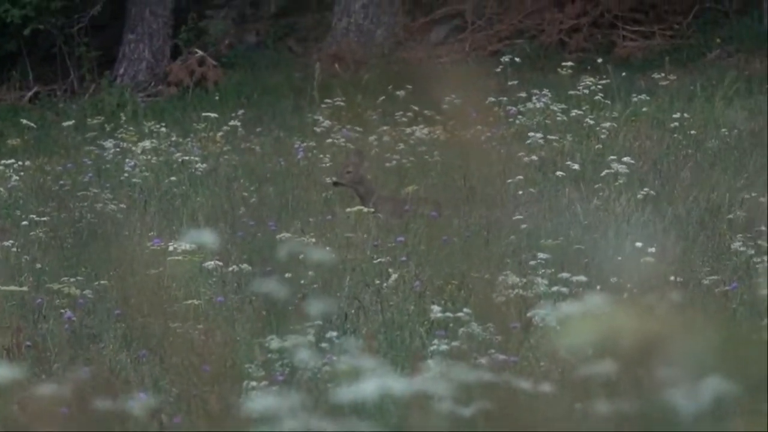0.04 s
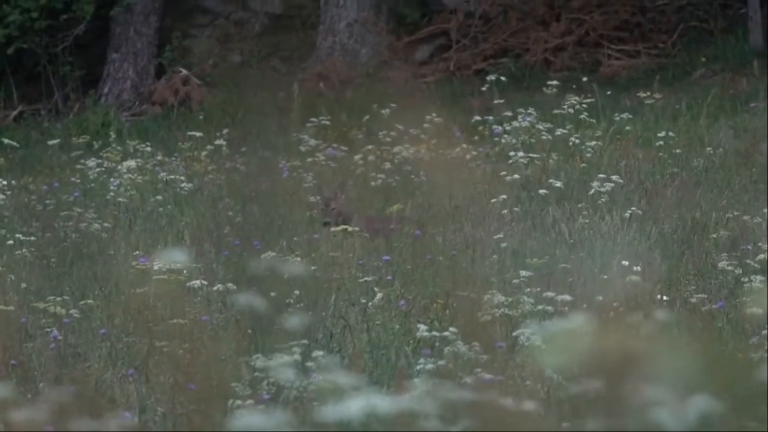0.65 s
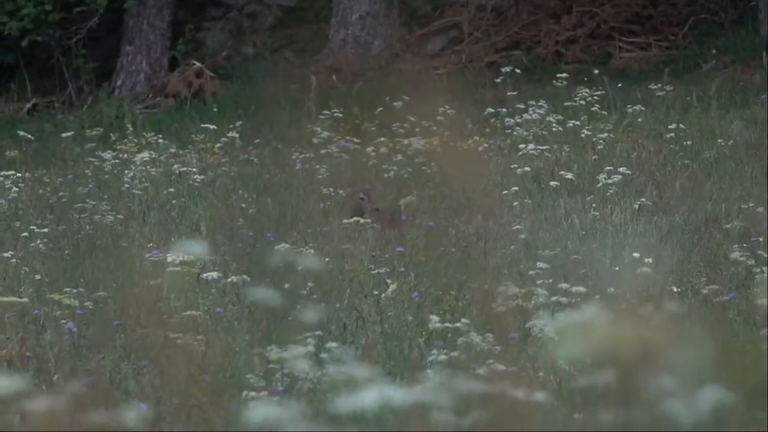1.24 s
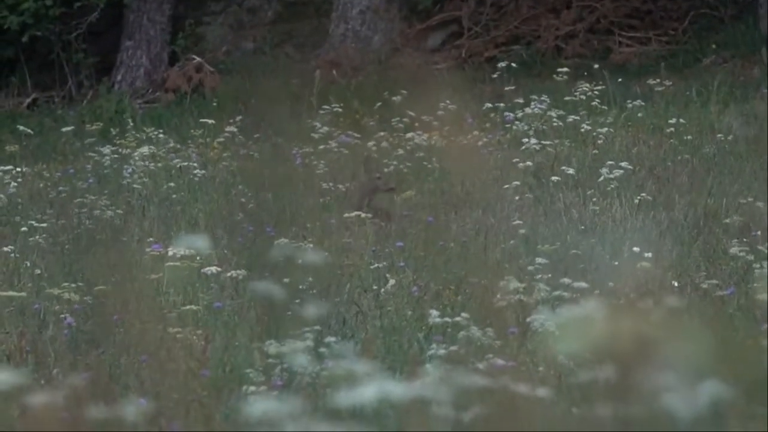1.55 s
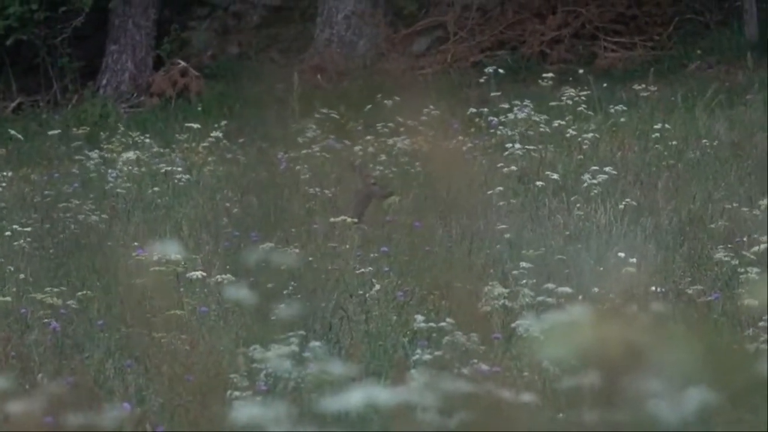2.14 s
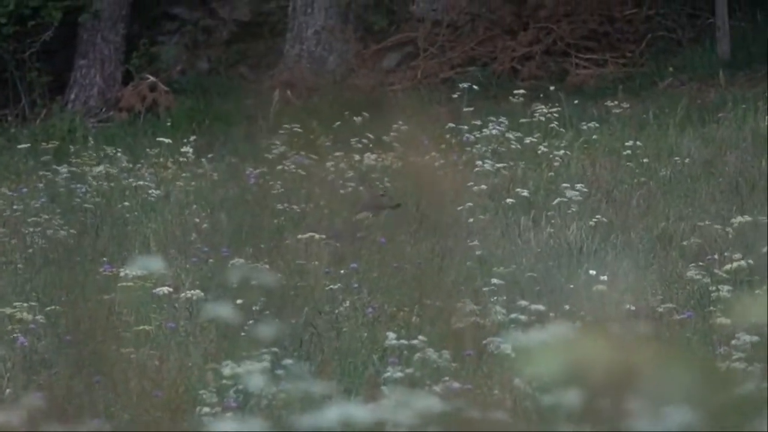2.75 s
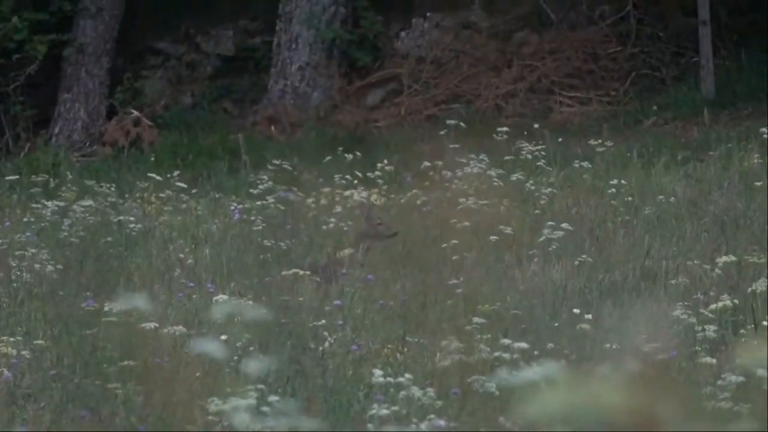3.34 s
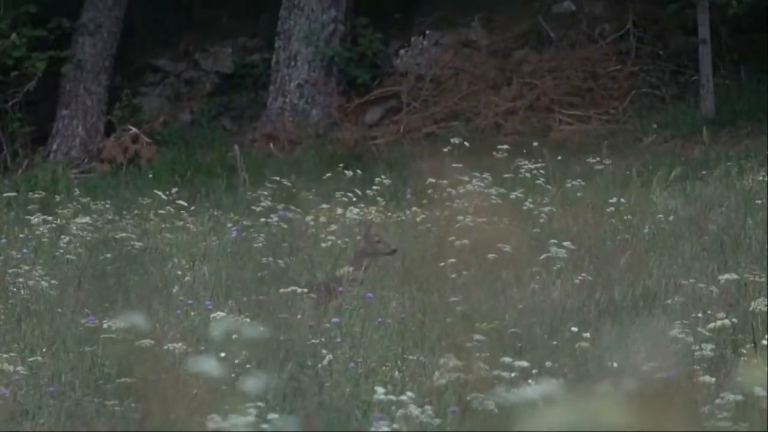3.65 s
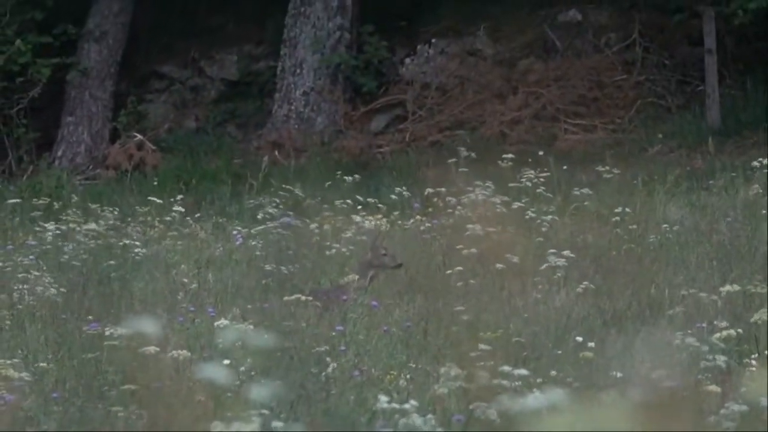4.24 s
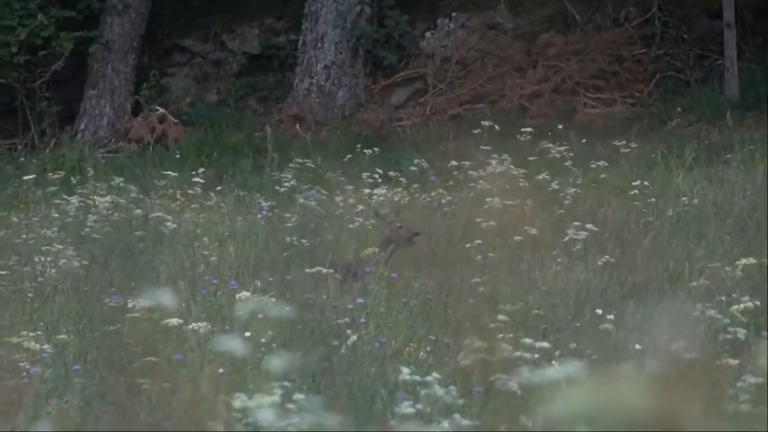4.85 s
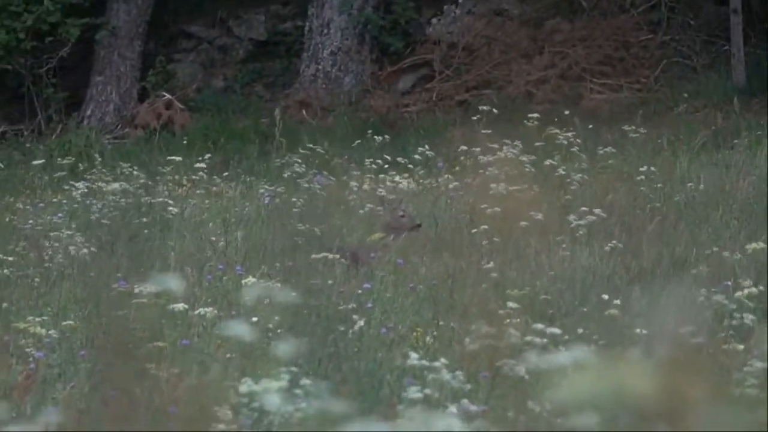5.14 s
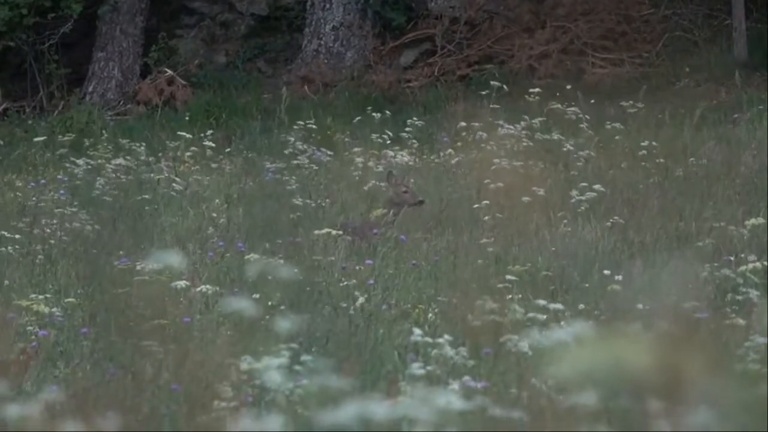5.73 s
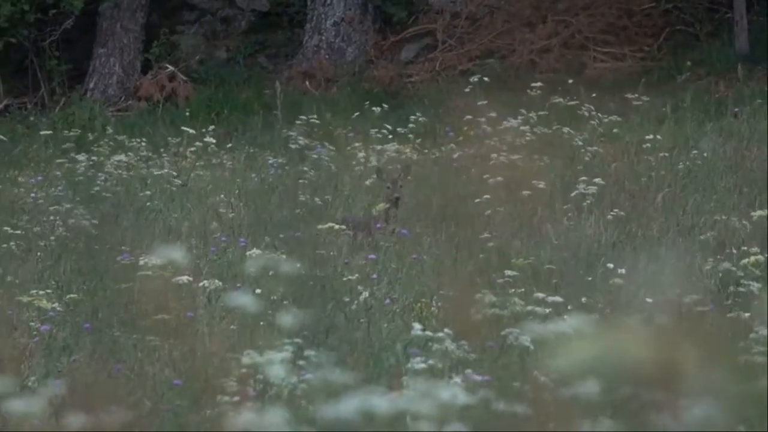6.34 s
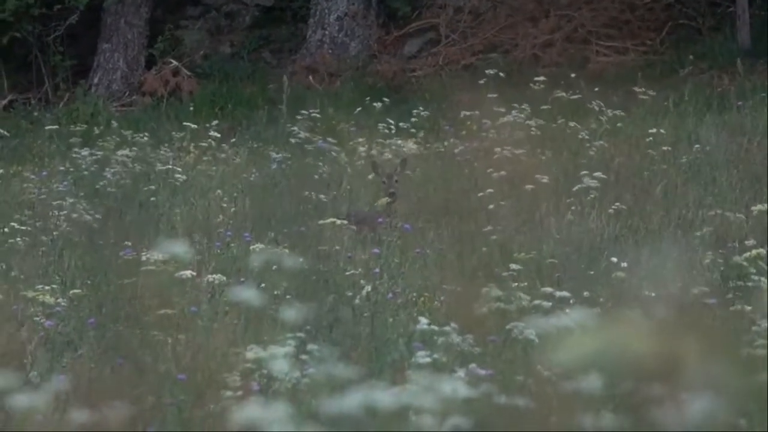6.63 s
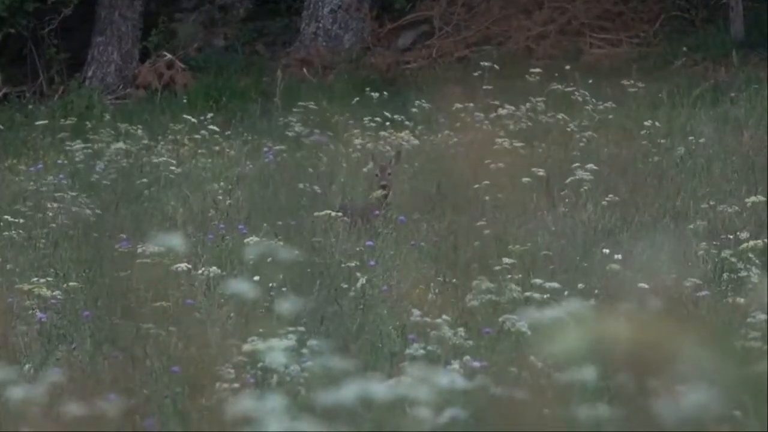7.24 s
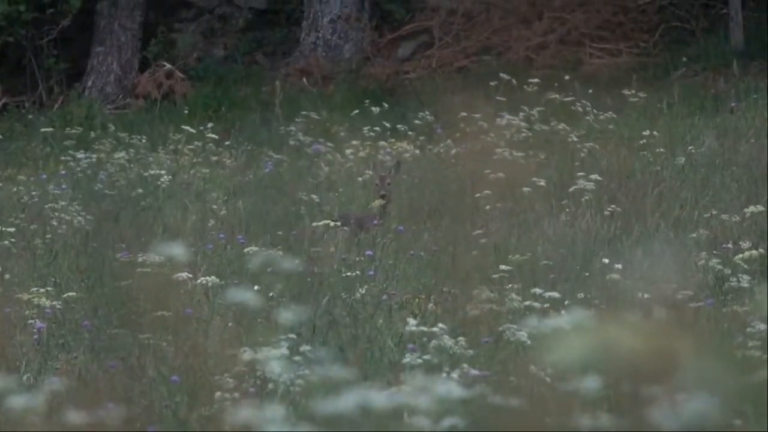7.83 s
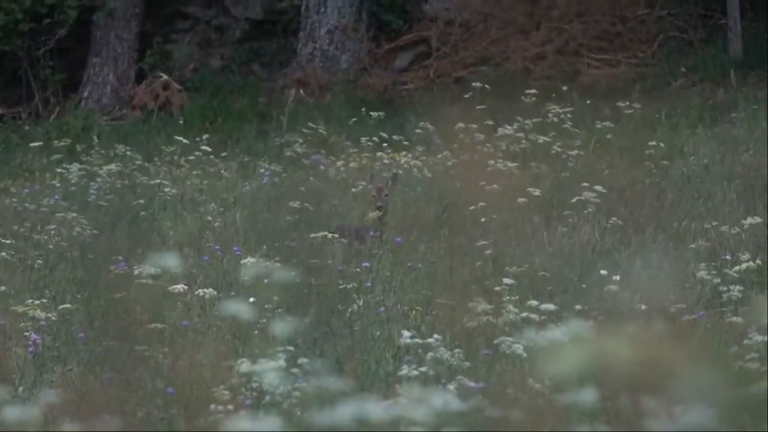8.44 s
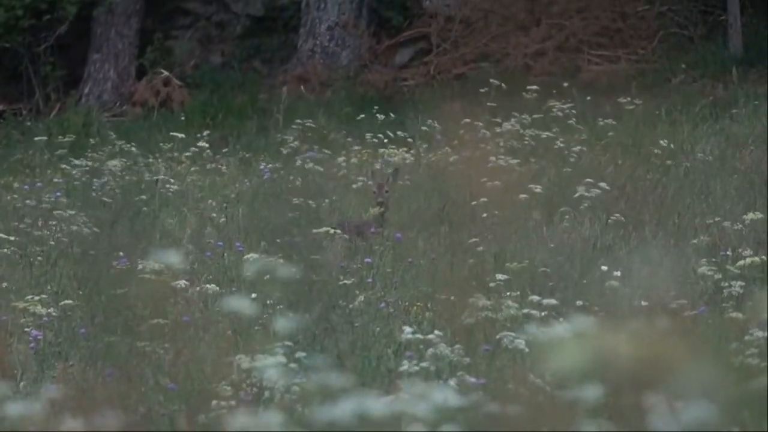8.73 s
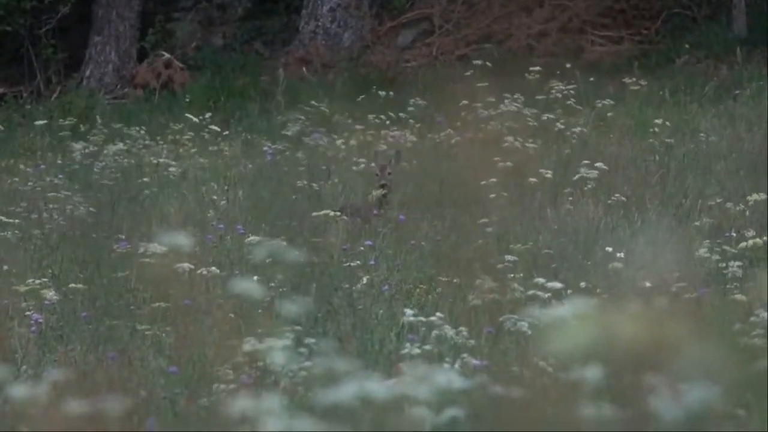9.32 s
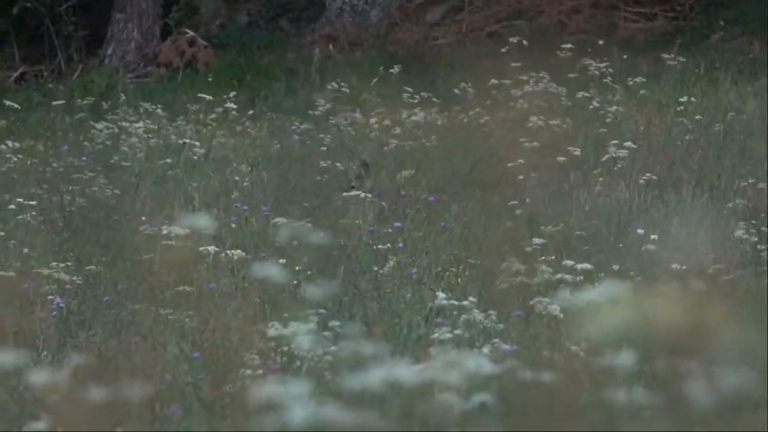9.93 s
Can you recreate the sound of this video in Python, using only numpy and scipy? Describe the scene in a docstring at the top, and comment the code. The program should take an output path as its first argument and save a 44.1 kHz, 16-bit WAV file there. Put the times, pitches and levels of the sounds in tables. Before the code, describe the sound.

A faint distant rush, light microphone hiss and a far bird chorus run throughout in a quiet meadow beside a forest. A bird gives two rising calls at the start. From about 1 to 3 seconds another warbles on the left, while a repeated high note rings in the wood. From 2.3 to 3.6 seconds a near bird on the right sings four chips and a sinking zigzag run. More warbles follow, then a clear rising call at 4.7 seconds. At about 5 seconds a deer barks once, the loudest sound, under half a second long: a hoarse start, a clear arched note and a rasping fall. The trees throw it back, and a far slope answers softly a second later. Thin distant notes follow, then warbles on the right around 7 to 8 seconds, growing faint afterward. Small dry knocks, mostly before the bark, and faint rustles come and go.

```python
"""First you hear a distant rush, faint microphone hiss and songbirds whistling in the trees on both sides.
Small knocks and rustles come and go. About five seconds in, a roe deer barks once across the meadow:
a hoarse start, a clear arched note and a rasping fall, as its vocal folds shake unevenly, settle and
turn rough again. The forest edge throws the bark back, and a far slope answers about a second later."""
import sys
import numpy as np
from scipy import signal
from scipy.fft import rfft, irfft, next_fast_len
from scipy.io import wavfile
from scipy.ndimage import uniform_filter1d, map_coordinates

SR = 44100
rng = np.random.default_rng(int(sys.argv[2]) if len(sys.argv) > 2 else 0)


def wav_record(signal):
    """Record a signal, one row per channel, as 16-bit PCM in the file named by sys.argv[1]."""
    frames = np.transpose(np.atleast_2d(signal))
    bounded = np.clip(frames, -1, 1)
    # unit amplitude maps onto the largest positive 16-bit level
    quanta = np.round(bounded * 32767).astype(np.int16)
    wavfile.write(sys.argv[1], SR, quanta)


N = 440118

# Tone colour of four steady noises: frequency_hz, relative_level_db
RUSH_COLOUR = [(100, -55), (250, -30), (340, -20.5), (430, -12), (480, -6), (540, -5), (590, 2.5),
               (700, -8.5), (790, -7.5), (860, -2), (950, -8.5), (1230, -6.5), (1600, -16.5)]
RUMBLE_COLOUR = [(25, -39), (55, -20), (110, -15.5), (160, -11.5), (230, -6), (275, 5), (320, -9),
                 (420, -16), (600, -27)]
HISS_COLOUR = [(100, -24.5), (1200, -1.5), (2000, 2), (5000, -3), (7000, -4), (11000, -6.5)]
CHORUS_COLOUR = [(1500, -33.5), (2200, -9), (3000, -0.5), (4200, -1), (4900, -6), (6500, -32)]
# How alike those noises are in both ears: frequency_hz, likeness (1 is identical)
EAR_LIKENESS = [(60, 0.62), (600, 0.79), (1200, 0.27), (2000, 0.16), (10000, 0.42)]
# How the rumble and the far birds swell and fade: time_s, level_db
RUMBLE_LEVELS = [(0, -85), (1.2, -78), (2.3, -76), (3.6, -82), (7.6, -80.5), (9.98, -78)]
CHORUS_LEVELS = [(0, -64), (.8, -61), (3.5, -60.5), (4.3, -57), (6.2, -68.5), (7.0, -60), (8.3, -63),
                 (9.98, -65)]
# Faint rustles and high wheezes: middle_s, length_s, centre_hz, width_hz, level_db
RUSTLES = [(1.409, 0.074, 6180, 260, -57), (7.678, 0.16, 6200, 2400, -63), (8.097, 0.24, 5250, 1512, -64.5),
           (8.35, 0.63, 2470, 960, -63), (8.38, 0.11, 4600, 2808, -64), (3.116, 0.36, 6900, 650, -70)]
# Soft knocks: start_s, peak_db
KNOCKS = [(0.183, -45), (2.506, -46.5), (2.893, -45.5), (3.799, -46), (4.066, -41), (9.001, -49)]
# Where the warbling birds sit, by name: pan_db (left minus right), leaf_scatter (0 to 1), pitch_waver
PERCHES = {"left": (9.8, 0.46, 0.0069), "right": (-16, 0.54, 0.013), "thicket": (-5, 0.878, 0.0463),
           "far": (-1, 0.39, 0.0055)}
# Their notes: start_s, length_s, first_hz, last_hz, level_db, perch_name
WARBLES = [(0.882, 0.091, 3680, 3500, -56, "far"), (1.158, .083, 3180, 3470, -51.5, "left"),
           (1.513, 0.095, 2450, 2800, -59, "left"), (1.684, .068, 3640, 2990, -47, "left"),
           (1.755, 0.089, 3190, 3110, -50.5, "left"), (1.968, .122, 2624, 3680, -48.5, "left"),
           (2.098, 0.076, 3720, 3745, -46, "left"), (2.192, 0.051, 3220, 3130, -46.5, "left"),
           (2.228, 0.0625, 3655, 3880, -44.5, "left"), (2.401, 0.0786, 3100, 2720, -47.5, "left"),
           (2.462, .04, 5200, 4920, -61, "far"), (2.644, 0.078, 2680, 2630, -54, "left"),
           (2.869, 0.075, 3240, 3390, -50.5, "left"), (2.939, 0.0856, 3490, 3754, -46, "left"),
           (3.087, .105, 3665, 2873, -46.5, "left"), (3.35, 0.06, 6250, 6800, -68, "far"),
           (3.79, .062, 3074, 3670, -47, "right"), (3.809, 0.09, 4067, 4280, -45, "right"),
           (3.854, 0.1015, 2260, 2040, -54.5, "thicket"), (4.019, .087, 2960, 3390, -54.5, "right"),
           (4.453, .116, 3184, 3540, -57.5, "right"), (4.669, 0.047, 3940, 3650, -60, "far"),
           (6.416, 0.11, 4050, 4015, -55.5, "thicket"), (6.876, 0.03095, 3700, 3270, -53.5, "right"),
           (6.887, 0.17, 4100, 4270, -54, "thicket"), (7.118, .061, 2800, 3330, -58, "right"),
           (7.208, 0.097, 3920, 3600, -49.5, "right"), (7.377, .049, 3300, 3560, -52.5, "right"),
           (7.437, .046, 3780, 3350, -50.5, "right"), (7.472, .052, 3030, 2464, -60, "right"),
           (7.811, 0.095, 3385, 3050, -54, "right"), (7.901, .1, 3460, 4030, -55, "right"),
           (8.336, 0.13, 3560, 3150, -62.5, "far"), (8.558, 0.18, 3980, 4210, -68, "far"),
           (8.748, 0.18, 2045, 1900, -68.5, "far"), (8.912, 0.21, 4020, 4310, -70, "far"),
           (9.07, .13, 3990, 3290, -69, "far"), (9.432, 0.22, 2900, 2710, -67.5, "far")]
# Climbing calls: start_s, length_s, first_hz, top_hz, level_db, pan_db, leaf_scatter (0 to 1)
RISING_CALLS = [(0.089, 0.14, 2560, 4210, -47, 12, 0.14), (0.404, 0.11, 3170, 4700, -51.5, -4, .5),
                (4.714, 0.16, 2660, 4420, -39.5, -4.5, 0.1)]
# One bird's repeated note: start_s, level_db
FLICKED_NOTES = [(.8, -54), (.99, -49), (1.235, -49), (1.544, -50), (3.93, -50), (4.123, -48), (4.327, -51),
                 (6.78, -53.5), (7.06, -52), (7.291, -56), (9.887, -56.5)]
# Short chips that open the zigzag song: start_s, level_db
CHIPS = [(2.306, -47), (2.379, -44), (2.445, -44), (2.515, -43)]
# The up-and-down syllables of that song: top_time_s, top_hz
ZIGZAGS = [(2.661, 4820), (2.832, 4960), (3.004, 4580), (3.179, 4370), (3.312, 3130), (3.444, 3070),
           (3.572, 3210)]
# High pitches at which the deer's throat rings: centre_hz, width_hz, relative_level_db
THROAT_RESONANCES = [(1870, 840, -14.5), (2370, 130, -1.5), (2740, 300, -0.5), (3100, 160, -1),
                     (3570, 95, -11.5), (4720, 110, -12.5), (6100, 250, -27)]
# The course of the bark: time_s, pitch_hz, roughness (0 clear, 1 or more hoarse), mouth_db, throat_db
BARK_SHAPE = [(4.915, 464.7, 1.1, -58, -81), (4.96, 598.5, 1.01, -42, -49.5),
              (4.999, 663, 0.38, -41, -44.5), (5.04, 675, 0, -34.5, -42), (5.1, 676.5, 0.13, -30, -42.5),
              (5.13, 660, 0.36, -32.5, -39), (5.16, 623.3, 0.16, -28, -47.5), (5.2, 602.2, 0.1, -32, -35.5),
              (5.22, 587.4, 0.41, -33, -38), (5.24, 550.4, 0.96, -33.5, -43.5), (5.268, 491, 1, -40, -56),
              (5.291, 469.7, 1.23, -53, -79)]
# Echoes from the trees and the far slope: delay_s, level_db, fade_s (to fall 60 dB), dull_above_hz
ECHOES = [(.02, -8.5, 0.25, 5000), (.085, -17, 1.2, 4000), (.18, -13, 0.47, 3020), (.4, -25.5, 2.8, 2000),
          (.9, -24, 1.7, 1698)]


def amp(db):
    """Turn decibels into a number to multiply by."""
    return 10 ** (np.asarray(db) / 20)


def unit(x):
    """Scale x to an average power of 1."""
    return x / np.sqrt(np.mean(x ** 2) + 1e-20)


def along(points, hz):
    """Read a (frequency, value) table at hz, with octaves evenly spaced."""
    frequencies, values = np.transpose(points)
    return np.interp(np.log(hz + 1), np.log(frequencies + 1), values)


def curves(rows, t):
    """Read each column after the first at the times t."""
    times, *columns = np.transpose(rows)
    return [np.interp(t, times, column) for column in columns]


def wobble(rate, size):
    """A smooth curve through `rate` random values a second."""
    points = rng.standard_normal(int(size * rate / SR) + 4)
    return map_coordinates(points, [np.arange(size) * rate / SR])


def filtered(x, response):
    """Scale each frequency in x by response(hz)."""
    n = x.shape[-1]
    padded = next_fast_len(n + 8192)
    return irfft(rfft(x, padded) * response(np.fft.rfftfreq(padded, 1 / SR)), padded)[..., :n]


def add(track, start_s, x):
    """Mix x into the track from start_s on."""
    part = track[..., max(round(start_s * SR), 0):][..., :x.shape[-1]]
    part += x[..., :part.shape[-1]]


def panned(pan_db):
    """Gains for the two ears; a positive pan_db is louder on the left."""
    return unit(amp([[pan_db / 2], [-pan_db / 2]]))


def noise_pair(alike, size):
    """White noise for each ear, identical when alike is 1."""
    shared, apart = rng.standard_normal((2, size))
    angle = np.arccos(np.clip(alike, -1, 1)) / 2
    return np.cos(angle) * shared + np.sin(angle) * np.array([apart, -apart])


def steady_noise(response):
    """Stereo noise of power 1 in a given tone colour, most alike between the ears in the bass."""
    def weights(hz):
        angle = np.arccos(np.clip(along(EAR_LIKENESS, hz), -1, 1)) / 2
        return response(hz) * [np.cos(angle), np.sin(angle)]
    shared, apart = filtered(rng.standard_normal((2, N)), weights)
    return unit(np.array([shared + apart, shared - apart]))


def background(rush_db=-57.5, hiss_db=-59.5, dull_above_hz=1900):
    """A distant rush that has lost its treble on the way, its slow rumble, and microphone hiss."""
    rush = steady_noise(lambda hz: amp(along(RUSH_COLOUR, hz)) / (1 + (hz / dull_above_hz) ** 6))
    rush *= amp(rush_db + 0.51 * wobble(1.31, N) + 0.94 * wobble(6.3, N))
    rumble_db, = curves(RUMBLE_LEVELS, np.arange(N) / SR)
    rumble = amp(rumble_db + 0.4 * wobble(2.4, N)) * steady_noise(lambda hz: amp(along(RUMBLE_COLOUR, hz)))
    hiss = amp(hiss_db) * steady_noise(lambda hz: amp(along(HISS_COLOUR, hz)))
    return panned(-2) * rush + panned(-.5) * (rumble + hiss)


def rustles(grain_db=3):
    """Soft grainy swishes from the grass and the trees."""
    out = np.zeros((2, N))
    for middle_s, length_s, centre_hz, width_hz, db in RUSTLES:
        n = int(length_s * SR)
        grains = noise_pair(.4, n) * amp(grain_db * wobble(154.6, n))
        swish = filtered(grains, lambda hz: 1 / (1 + (2 * (hz - centre_hz) / width_hz) ** 4))
        add(out, middle_s - length_s / 2, amp(db) * unit(swish) * np.sin(np.pi * np.arange(n) / n))
    return out


def knocks(fade_s=0.029, centre_hz=1300, width_hz=450):
    """Small dry knocks close by, each a burst of noise in one broad resonance."""
    out, t = np.zeros(N), np.arange(SR // 10) / SR
    band = signal.butter(2, [centre_hz - width_hz / 2, centre_hz + width_hz / 2], "band", fs=SR)
    for start_s, db in KNOCKS:
        knock = signal.lfilter(*band, rng.standard_normal(len(t)) * amp(-60 * t / fade_s))
        add(out, start_s, amp(db) * knock / np.abs(knock).max())
    return panned(-3) * out


def echo_tail(fade_s, alike, size):
    """Sound bouncing off trunks and leaves: stereo noise that falls 60 dB in fade_s."""
    t = np.arange(size) / SR
    onset = 1 - np.exp(-t / 0.00092)
    return unit(noise_pair(alike, size) * amp(-60 * t / fade_s) * onset) / np.sqrt(size)


def glide(length_s, first_hz, middle_hz, last_hz):
    """A pitch that bends smoothly through three values."""
    progress = np.linspace(0, 1, max(int(length_s * SR), 200))
    return np.polyval(np.polyfit([0, .5, 1], [first_hz, middle_hz, last_hz], 2), progress)


def sweep(length_s, first_hz, last_hz, sag):
    """A glide whose middle hangs below the straight line by `sag` times its span."""
    middle_hz = (first_hz + last_hz) / 2 - sag * abs(last_hz - first_hz)
    return glide(length_s, first_hz, middle_hz, last_hz)


def whistle(hz, db, pan_db, scatter, waver=0.0072, blur=0.014, flutter_db=3, wood_db=-7, lateness=0.73):
    """One bird note that arrives directly, scattered by nearby leaves, and ringing in the wood."""
    n = len(hz)
    progress = (np.arange(n) + .5) / n
    swell = np.sin(np.pi * progress ** lateness) ** .5 * amp(flutter_db * wobble(112, n))
    hz = hz * (1 + (waver + blur * scatter ** 2) * wobble(400.4, n))  # far notes lose their sharp pitch
    tone = amp(db) * unit(swell * np.sin(2 * np.pi * np.cumsum(hz) / SR))
    wood = amp(wood_db) * echo_tail(fade_s=0.82, alike=0.67, size=SR * 3 // 4)
    leaves = echo_tail(fade_s=0.17, alike=0.77, size=SR // 4)
    paths = panned(0.65 * pan_db) * np.sqrt(scatter) * wood
    add(paths, .002, panned(pan_db) * np.sqrt(scatter) * leaves)
    paths[:, :1] += panned(pan_db) * np.sqrt(1 - scatter)  # the direct path
    return signal.fftconvolve(tone[None], paths, axes=1)


def far_chorus(count=120, haze_db=-2, chirp_db=-5):
    """Many birds deep in the wood: faint random chirps and the haze of their echoes."""
    chirps = np.zeros((2, N))
    for k, (when, length, height, slope, side) in enumerate(rng.random((count, 5))):
        centre_hz, half_rise_hz = 2400 + 2100 * height, 900 * (slope - .5)
        hz = sweep(.06 + .12 * length, centre_hz - half_rise_hz, centre_hz + half_rise_hz, sag=.12)
        start_s = (k + when) / count * N / SR  # spread about evenly in time
        add(chirps, start_s, whistle(hz, db=0, pan_db=-6 + 13 * (side - .5), scatter=0.56))
    level_db, = curves(CHORUS_LEVELS, np.arange(N) / SR)
    haze = steady_noise(lambda hz: amp(along(CHORUS_COLOUR, hz))) * amp(1.25 * wobble(9.6, N))
    return amp(level_db) * (amp(haze_db) * haze + amp(chirp_db) * unit(chirps))


def arched_notes(count=10, start_s=5.27, every_s=.1612):
    """A far bird repeats a thin note that rises and falls, at an even pace."""
    out = np.zeros((2, N))
    hz = glide(.08, 3500, 4680, 3840)
    for k in range(count):
        db = -66 + 2 * rng.standard_normal()
        add(out, start_s + k * every_s, whistle(hz, db, pan_db=3, scatter=.12))
    return out


def warblers():
    """Birds on four perches sing sliding notes."""
    out = np.zeros((2, N))
    for start_s, length_s, first_hz, last_hz, db, perch in WARBLES:
        hz = sweep(length_s, first_hz, last_hz, sag=.12 if last_hz > first_hz else .33)
        add(out, start_s, whistle(hz, db, *PERCHES[perch]))
    return out


def flicked_notes(flick_hz=818, flick_s=.011):
    """A bird flicks up to the same held note again and again, ringing long in the wood."""
    out = np.zeros((2, N))
    held_hz = glide(0.082, 4137, 4137, 4055)
    t = np.arange(len(held_hz)) / SR
    hz = held_hz - flick_hz * np.exp(-(t / flick_s) ** 2)
    for start_s, db in FLICKED_NOTES:
        add(out, start_s, whistle(hz, db, pan_db=-4, scatter=0.26, waver=0.0076, blur=0, wood_db=3.5))
    return out


def rising_calls(octave_share=0.34, octave_db=-22.5):
    """Single calls that swell as they climb; the early part also sounds faintly an octave higher."""
    out = np.zeros((2, N))
    for start_s, length_s, first_hz, top_hz, db, pan_db, scatter in RISING_CALLS:
        hz = sweep(length_s, first_hz, top_hz, sag=.17)
        add(out, start_s, whistle(hz, db, pan_db, scatter, lateness=1.6))
        octave_hz = 2 * hz[:int(octave_share * len(hz))]
        add(out, start_s, whistle(octave_hz, db + octave_db, pan_db, scatter=0.54))
    return out


def zigzag_song(pan_db=-16.5, fade_db_per_s=8):
    """A near bird on the right: four chips, then a sinking, fading run of three-stroke syllables."""
    out = np.zeros((2, N))
    for start_s, db in CHIPS:
        add(out, start_s, whistle(sweep(0.0248, 3000, 3430, sag=0), db, pan_db, scatter=0.25))
    for top_s, top_hz in ZIGZAGS:
        db = -42.5 - fade_db_per_s * (top_s - ZIGZAGS[0][0])
        lead_in = glide(0.0182, 2600 + 0.345 * top_hz, 2450 + 0.22 * top_hz, 2100 + 0.19 * top_hz)
        rise = glide(0.027, 2313, 2280 + .2 * top_hz, top_hz)
        fall = glide(0.027, 1400 + 0.46 * top_hz, 2150 + 0.16 * top_hz, 1500 + 0.13 * top_hz)
        pause_s = (top_hz - 2900) * 3e-6  # the voice breaks off briefly at a high top
        add(out, top_s - .05, whistle(lead_in, db - 2.5, pan_db, scatter=0.12))
        add(out, top_s - .027, whistle(rise, db - 5, pan_db, scatter=0.19))
        add(out, top_s + pause_s, whistle(fall, db - 2, pan_db, scatter=0.18))
    return out


def levelled(x):
    """Even out x so that its power stays near 1 over about 20 ms."""
    return x / np.sqrt(np.abs(uniform_filter1d(x ** 2, size=900)) + 1e-12)


def mouth_sound(pitch_hz, phase, rough, air, width_hz=26, sag=0.106, spill=0.22):
    """The open mouth rings an octave above the pitch; in a rough voice, breath rings it a bit lower."""
    ring_hz = 2 * pitch_hz * (1 - sag * rough ** 2)
    # shift the breath down, filter it and shift it back: a narrow band that follows ring_hz
    shift = np.exp(2j * np.pi * np.cumsum(ring_hz) / SR)
    ring = signal.lfilter(*signal.butter(2, width_hz, fs=SR), air / shift) * shift
    hoarse = unit(signal.sosfilt(signal.butter(4, [600, 1350], "band", fs=SR, output="sos"), air))
    clear = np.sqrt(1 - rough ** 2) * np.sqrt(2) * np.sin(2 * phase)
    return levelled(clear + rough * levelled(ring.real)) + spill * np.sqrt(rough) * hoarse


def throat_sound(pitch_hz, phase, rough, air, rasp=0.86, muffle_db_per_hz=0.3):
    """Vocal folds snapping shut, and rasping breath, set the throat's high resonances ringing."""
    def resonances(hz):
        peaks = sum(amp(db) / np.sqrt(1 + (2 * (hz - centre_hz) / width_hz) ** 4)
                    for centre_hz, width_hz, db in THROAT_RESONANCES)
        return peaks * (hz > 1500)
    pulses = np.sqrt(1 - rough ** 2) * sum(np.cos(k * phase) for k in range(3, 11))
    ringing = levelled(filtered(pulses + rasp * (1 + 5 * rough) * air, resonances))
    # the treble is muffled as the pitch drops and the mouth closes
    treble = filtered(ringing, lambda hz: hz > 4200)
    return ringing - treble + treble * amp(muffle_db_per_hz * (pitch_hz - pitch_hz.max()))


def lowest_tone(t, phase, rough, start_s=4.958, end_s=5.275, ramp_s=0.026):
    """The tone at the pitch of the vocal folds fades as the air runs out and is weaker when rough."""
    db = -41.5 - 29 * (t - start_s) - 7 * rough
    ramp = np.clip(np.minimum(t - start_s, end_s - t) / ramp_s, 0, 1)
    return amp(db) * ramp * np.sqrt(2) * np.sin(phase)


def bark(pitch_shake=0.016, level_shake=0.58, rattle=0.39, low_cut_hz=430):
    """The vocal folds go from chaos to a clean tone and back, while the mouth opens and closes."""
    start_s, end_s = BARK_SHAPE[0][0], BARK_SHAPE[-1][0]
    t = np.arange(start_s, end_s, 1 / SR)
    n = len(t)
    pitch_hz, rough, mouth_db, throat_db = curves(BARK_SHAPE, t)
    rough = np.clip(rough, 0, 1)
    shaky_hz = pitch_hz * (1 + pitch_shake * np.sqrt(rough) * wobble(349.6, n))
    phase = 2 * np.pi * np.cumsum(shaky_hz) / SR
    air = unit(rng.standard_normal(n) * (1 + np.cos(phase)))  # one puff per cycle
    mouth = amp(mouth_db) * mouth_sound(pitch_hz, phase, rough, air)
    throat = amp(throat_db) * throat_sound(pitch_hz, phase, rough, air)
    # unsteady folds make the loudness stagger
    stagger = lambda: unit(1 + level_shake * np.sqrt(rough * (1 - rough)) * wobble(169.3, n))
    voice = mouth * stagger() + (lowest_tone(t, phase, rough) + throat) * stagger()
    # when the voice is rough and forced, every third cycle is stronger
    strain = rough * np.clip(amp(mouth_db + 27.5), 0, 1)
    voice *= 1 + rattle * strain * np.cos(phase / 3)
    out = np.zeros(N)
    add(out, start_s, filtered(voice, lambda hz: 1 - 1 / (1 + (hz / low_cut_hz) ** 8)))
    return out


def deer():
    """The bark arrives straight over the grass, then from the trees and the far slope."""
    call, echoes = bark(), np.zeros((2, 3 * SR))
    for delay_s, db, fade_s, dull_hz in ECHOES:
        tail = echo_tail(fade_s, alike=0.73, size=2 * SR)
        add(echoes, delay_s, amp(db) * filtered(tail, lambda hz: 1 / np.sqrt(1 + (hz / dull_hz) ** 4)))
    return panned(-2) * call + signal.fftconvolve(call[None], echoes, axes=1)[:, :N]


def scene():
    """Everything heard from the meadow."""
    meadow = background() + deer() + knocks() + rustles()
    birds = warblers() + rising_calls() + flicked_notes() + zigzag_song() + arched_notes()
    return meadow + birds + far_chorus()


def record(dry):
    """Remove the highest treble, everything above 11080 Hz."""
    return filtered(dry, lambda hz: hz < 11080)


dry = scene()
out = record(dry)
wav_record(out)
```